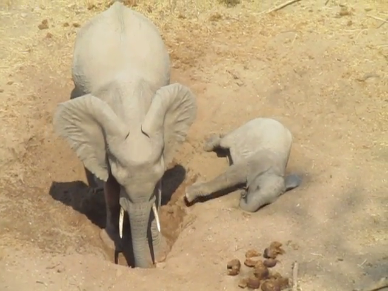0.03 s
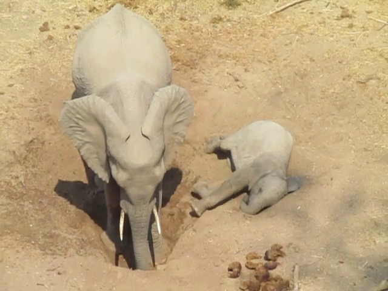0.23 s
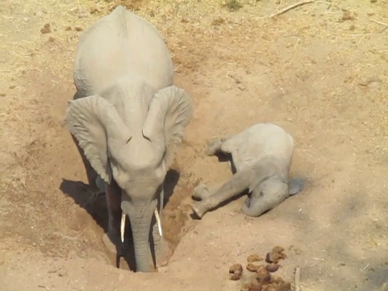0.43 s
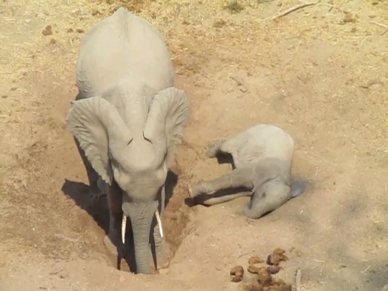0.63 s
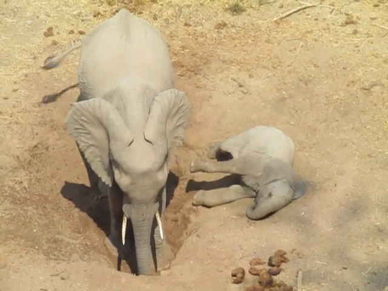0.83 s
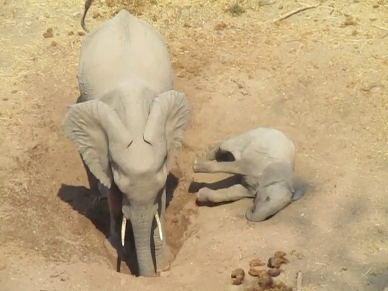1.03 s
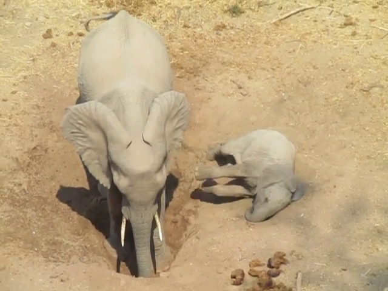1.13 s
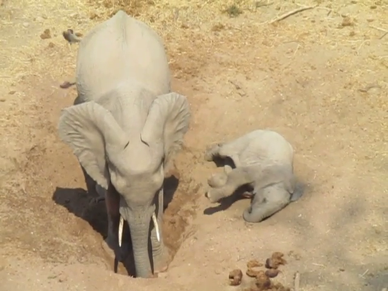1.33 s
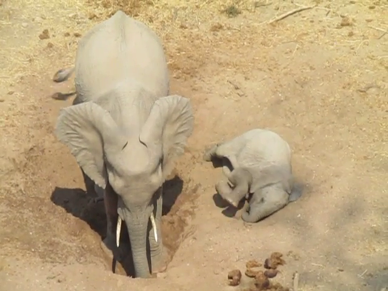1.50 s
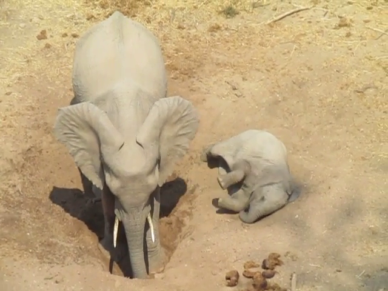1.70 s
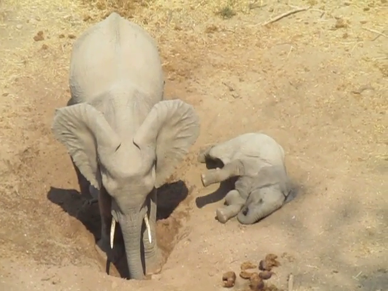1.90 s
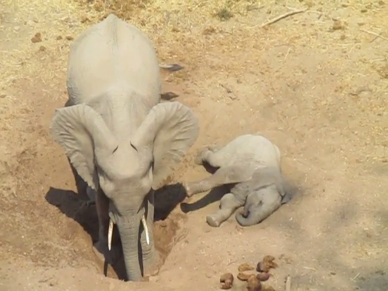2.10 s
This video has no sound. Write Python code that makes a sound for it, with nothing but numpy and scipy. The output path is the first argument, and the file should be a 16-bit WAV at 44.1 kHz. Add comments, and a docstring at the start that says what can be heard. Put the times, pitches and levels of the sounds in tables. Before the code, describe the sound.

Two raspy, high squeals from an elephant calf outdoors, over low buffeting wind.

```python
"""A young animal, such as an elephant calf, gives two shrill, hoarse squeals on open dry ground.
Each is a wavering high tone, split into sidebands and wrapped in rasp: the first by a slower flutter,
the second by a lower oscillator. Wind rumbles, buffets and pops on two microphone ports.
A far bird peeps once over faint hiss."""
import sys
import numpy as np
from scipy import signal
from scipy.fft import rfft, irfft, next_fast_len
from scipy.io import wavfile
from scipy.ndimage import uniform_filter1d, map_coordinates

SR = 44100
rng = np.random.default_rng(int(sys.argv[2]) if len(sys.argv) > 2 else 0)


def master_out(mix):
    """Clip the mix to full scale and print it as 16-bit PCM to the path in sys.argv[1]."""
    frames = np.transpose(np.atleast_2d(mix))
    ceiling = np.clip(frames, -1, 1)
    pcm = np.round(ceiling * 32767).astype(np.int16)
    wavfile.write(sys.argv[1], SR, pcm)


N = 94815

# Squeal pitch. Each row: time in seconds, pitch in Hz.
FIRST_PITCH = [(0, 1550), (.018, 1130), (.044, 1720), (.088, 1700), (.108, 1460), (.128, 1590),
               (.155, 1290), (.193, 1210), (.216, 1660), (.236, 1520), (.266, 1620), (.28, 1900),
               (.286, 2750), (.297, 1680), (.31, 1920), (.322, 1610), (.379, 1740), (.41, 1520)]
SECOND_PITCH = [(.99, 1480), (1.016, 1860), (1.038, 1680), (1.066, 2030), (1.086, 1880), (1.118, 2250),
                (1.148, 2010), (1.169, 2430), (1.191, 2120), (1.211, 2305), (1.236, 2280), (1.26, 2080)]
# Vocal effort. Each row: time in seconds, relative level in dB.
FIRST_EFFORT = [(0, -45), (.018, -57.5), (.047, -43.5), (.086, -43), (0.199, -48), (.296, -42.5),
                (.335, -43), (0.378, -37.5), (.418, -54)]
SECOND_EFFORT = [(.97, -56.5), (1.026, -43.5), (1.071, -39.5), (1.086, -42.5), (1.122, -37), (1.153, -40.5),
                 (1.167, -35.5), (1.239, -32), (1.267, -52)]
# Throat colour. Each row: frequency in Hz, relative gain in dB.
FIRST_THROAT = [(700, -23.5), (1450, 1.5), (3600, -0.5), (5200, -6.5), (6400, -1.5), (9000, -21),
                (15500, -20)]
BROKEN_THROAT = [(1700, -5), (3400, 2.5), (5000, -9.5), (6800, -8), (8400, -13), (10000, -32.5),
                 (11500, -14), (15500, -30)]
SECOND_THROAT = [(900, -26), (1400, -8), (2250, -2.5), (3000, -1.5), (3700, 0.5), (4900, 5), (5750, -20.5),
                 (6400, -5.5), (9900, -23), (11500, -17), (15500, -36.5)]
# Voice texture. Each row: time in seconds, rasp share of the power, sideband share of the rest.
VOICE_TEXTURE = [(.29, .25, 0.11), (.36, 0.02, 0.99), (.98, 0.38, 0.61), (1.07, 0.22, .22),
                 (1.22, 0.02, 0.63)]
# Wind rumble. Each row: time in seconds, relative level in dB.
RUMBLE_LEVEL = [(0, -29.5), (.13, -47), (.3, -29), (.56, -33), (1.15, -22.5), (2.15, -33.5)]
# Rumble colour. Each row: frequency in Hz, relative gain in dB.
RUMBLE_SPECTRUM = [(20, -17.5), (60, 2.5), (180, -2.5), (400, -15.5), (1000, -54.5)]
# Gusts. Each row: start and length in seconds, level and left-over-right in dB, brightness in Hz.
WIND_BUFFETS = [(0.298, 0.0314, -21.5, 13.5, 85.5), (0.369, 0.0579, -24, 7.5, 149.3),
                (0.473, 0.0449, -23.5, 0.5, 96.7), (.685, 0.0457, -13.5, -1.5, 170.3),
                (0.787, 0.06074, -21, -2, 217), (0.991, 0.1189, -18, 4, 245),
                (1.172, 0.0256, -16.5, 7.5, 67.3), (1.357, 0.0812, -22.5, -3, 223.3),
                (1.525, .09, -23, -4.5, 177.4), (2.043, 0.01153, -25, 4, 188.3)]
# Single eddies. Each row: time in seconds, level before filtering in dB, brightness in Hz, port.
EDDY_POPS = [(0.2122, 3, 169.9, "L"), (0.3744, -7, 264, "L"), (0.4825, -5.5, 137.3, "L"),
             (0.6836, 0.5, 161, "R"), (.6947, 3, 223, "R"), (0.7077, 1.5, 261, "R"),
             (0.7287, -0.5, 195, "L"), (0.7888, -2, 321, "R"), (0.9401, 1.5, 228, "R"), (1.0, -5, 310, "L"),
             (1.0544, 0, 202, "L"), (1.0842, -2, 248, "R"), (1.3695, -3, 220, "R"),
             (1.4017, -2.5, 332, "R"), (1.587, 4.5, 190.6, "L"), (1.7307, -2, 129.3, "L"),
             (1.8228, -1.5, 118.5, "L")]
# Ground and bush scatter. Each row: frequency in Hz, time to fall 60 dB in seconds.
SCATTER_DECAY = [(4000, 0.583), (12000, 0.384)]
# Hiss colour. Each row: frequency in Hz, relative gain in dB.
HISS_SPECTRUM = [(600, 8.5), (1500, -1.5), (5400, -5), (10000, -12)]
# Hiss strength. Each row: time in seconds, relative level in dB.
HISS_LEVEL = [(.7, -55), (.73, -58.5)]

BREAK_S, BREAK_FADE_S = 0.311, .027
LOWER_HZ, MAIN_REF_HZ = 1380, 2300  # lower oscillator's pitch at this main pitch
RUMBLE_PAN_DB, PORT_CUTOFF_HZ = 5.5, 983
WAKE_DB, WAKE_DECAY_S = -22, 0.01046
CRACK_S, CRACK_DB, CRACK_HZ = .7079, -13, 1117
BLEED_GAIN, BLEED_DELAY_S = 0.247, 0.00042
PEEP_S, PEEP_WIDTH_S, PEEP_HZ, PEEP_DB = 1.972, 0.01884, 2983, -58.5
BAND_LIMIT_HZ = 15800


def first_squeal():
    """Thin squeal that yelps upwards, then breaks: its period doubles."""
    pitch_hz = wavering_pitch(FIRST_PITCH, jitter=0.0416)
    tilted_throat = [(hz, db - 4 * np.log2(hz)) for hz, db in FIRST_THROAT]
    tone, sidebands = fluttered_tone(pitch_hz, tilted_throat, divisor=6, blur_rad=0.466)
    broken = sum(fluttered_tone(pitch_hz, BROKEN_THROAT, divisor=2, blur_rad=0.644))
    fade_rad = np.pi / 2 * np.clip((clock() - BREAK_S) / BREAK_FADE_S + .5, 0, 1)
    sidebands = np.cos(fade_rad) * levelled(sidebands) + np.sin(fade_rad) * levelled(broken)
    return voice(tone, sidebands, FIRST_EFFORT, FIRST_THROAT)


def second_squeal():
    """Louder squeal climbing in waves; a lower oscillator swings twice as far and adds sum tones."""
    pitch_hz = wavering_pitch(SECOND_PITCH, jitter=0.01825)
    lower_hz = LOWER_HZ * (pitch_hz / MAIN_REF_HZ) ** 2
    tone = sum(partial(k * pitch_hz, SECOND_THROAT, blur_rad=0.505) for k in range(1, 8))
    sidebands = sum(partial(k * pitch_hz + m * lower_hz, SECOND_THROAT, blur_rad=0.527)
                    for k in range(6) for m in range(1, 5))
    return voice(tone, sidebands, SECOND_EFFORT, SECOND_THROAT)


def wavering_pitch(rows, jitter):
    """Smooth glide in Hz; trembles more as the voice gets hoarser."""
    rasp_share = curves(VOICE_TEXTURE)[0]
    glide_hz = uniform_filter1d(curves(rows)[0], size=260)
    return glide_hz * (1 + jitter * np.sqrt(rasp_share) * wobble(450))


def fluttered_tone(pitch_hz, throat, divisor, blur_rad):
    """Harmonics, and the sidebands that a flutter at pitch / divisor puts between them."""
    lines = {k: partial(pitch_hz * k / divisor, throat, blur_rad) for k in range(divisor, 10 * divisor)}
    harmonics = sum(line for k, line in lines.items() if k % divisor == 0)
    sidebands = sum(line for k, line in lines.items() if k % divisor)
    return harmonics, sidebands


def partial(hz, throat, blur_rad):
    """Unsteady sine coloured by the throat; blur_rad is its phase wander at 2 kHz."""
    phase = 2 * np.pi * (np.cumsum(hz) / SR + rng.random())
    phase += blur_rad * np.sqrt(hz / 2000) * wobble(300)
    level_db = log_interp(throat, hz) + 3.03 * wobble(110)
    return amp(level_db) * (hz < BAND_LIMIT_HZ) * np.sin(phase)


def voice(tone, sidebands, effort, throat):
    """Tone, sidebands and throat-coloured rasp, mixed by power and scaled by effort."""
    t = clock()
    rasp_share, side_share = curves(VOICE_TEXTURE)
    pitched = np.sqrt(1 - side_share) * levelled(tone) + np.sqrt(side_share) * levelled(sidebands)
    breath = noise_pair(lambda f: amp(log_interp(throat, f)))[0]
    rasp = unit_rms(breath * amp(2.43 * wobble(600)))
    gate = (t >= effort[0][0]) & (t <= effort[-1][0])
    return gate * amp(curves(effort)[0]) * (np.sqrt(1 - rasp_share) * pitched + np.sqrt(rasp_share) * rasp)


def wind():
    """Rumble, buffets and pops on both ports, which smooth away the finer turbulence."""
    rumble = turbulence(lambda f: amp(log_interp(RUMBLE_SPECTRUM, f)))
    ports = amp(curves(RUMBLE_LEVEL)[0]) * pan_gains(RUMBLE_PAN_DB) * rumble
    for start_s, length_s, db, pan_db, hz in WIND_BUFFETS:
        ports += amp(db) * pan_gains(pan_db) * buffet(start_s, length_s, hz)
    for at_s, db, hz, port in EDDY_POPS:
        ports["LR".index(port)] += amp(db) * pop(at_s, hz)
    ports = filtered(ports, lambda f: 1 / np.hypot(1, (f / PORT_CUTOFF_HZ) ** 2))
    crack = filtered(eddy(CRACK_S, CRACK_HZ), lambda f: high_pass(f, CRACK_HZ))
    ports[1] += amp(CRACK_DB) * crack  # one right-port pop also cracks
    bleed = filtered(ports[::-1], lambda f: np.exp(-2j * np.pi * f * BLEED_DELAY_S))
    return ports - BLEED_GAIN * bleed  # each port enters the other channel late and inverted


def buffet(start_s, length_s, hz):
    """Gust: turbulence that rises fast, holds and dies away."""
    age_s = clock() - start_s
    attack = np.clip(age_s / 0.00488 + .5, 0, 1)
    release = np.exp(-np.maximum(age_s - length_s, 0) / 0.0041)
    return churn(attack * release, hz)


def pop(at_s, hz):
    """One eddy hitting a port, with a fluttering wake."""
    pulse = filtered(eddy(at_s, hz), lambda f: high_pass(f, hz=138))
    wake_swell = np.exp(-np.abs(clock() - at_s - WAKE_DECAY_S / 2) / WAKE_DECAY_S)
    return pulse + amp(WAKE_DB) * churn(wake_swell, hz)[0]


def eddy(at_s, hz):
    """Smooth pressure pulse passing a port; faster is brighter."""
    return 1 / (1 + (2 * np.pi * hz * (clock() - at_s)) ** 2)


def churn(swell, hz):
    """Burst of turbulence with the rms of its swell."""
    burst = swell * turbulence(lambda f: np.exp(-f / hz) * high_pass(f, .5 * hz))
    return unit_rms(burst) * np.sqrt(np.mean(swell ** 2))


def turbulence(response, lumps_db=4.5):
    """Lumpy noise of rms 1, different on each port."""
    return unit_rms(noise_pair(response) * amp(lumps_db * np.array([wobble(130), wobble(130)])))


def bird():
    """One far peep; pitch and level arch together."""
    arch = np.exp(-((clock() - PEEP_S) / PEEP_WIDTH_S) ** 2 / 2)
    pitch_hz = PEEP_HZ * (1 - .07 * (1 - arch))
    return amp(PEEP_DB) * arch * np.sin(2 * np.pi * np.cumsum(pitch_hz) / SR)


def ground_reflections(x, t60_s=0.0286):
    """Quick reflections off nearby earth, different at each microphone."""
    t = np.arange(SR // 50) / SR
    taps = rng.standard_normal((2, len(t))) * amp(-60 * t / t60_s)
    taps /= np.linalg.norm(taps, axis=1, keepdims=True)
    return signal.fftconvolve(x[None], taps, axes=1)[:, :N]


def bush_scatter(x):
    """Diffuse tail from ground and bush; treble dies first."""
    hz, t, spectra = signal.stft(rng.standard_normal((2, SR // 2)), SR, nperseg=256)
    decay = amp(-60 * t / log_interp(SCATTER_DECAY, hz)[:, None])
    tail = signal.istft(spectra * decay, SR, nperseg=256)[1]
    return signal.fftconvolve(x[None], tail / np.linalg.norm(tail[0]), axes=1)[:, :N]


def outdoor_hiss():
    """Faint, wide hiss."""
    mid, side = noise_pair(lambda f: amp(log_interp(HISS_SPECTRUM, f))) * [[1], [.8]]
    return amp(curves(HISS_LEVEL)[0]) * np.array([mid + side, mid - side])


def amp(db):
    return 10 ** (np.asarray(db) / 20)


def unit_rms(x):
    return x / np.sqrt(np.mean(x ** 2) + 1e-20)


def levelled(x):
    """Short-term rms held at 1."""
    return x / np.sqrt(np.abs(uniform_filter1d(x * x, size=500)) + 1e-9)


def log_interp(rows, hz):
    """Table value at hz, on a log frequency axis."""
    knots_hz, values = np.transpose(rows)
    return np.interp(np.log(hz + 1), np.log(knots_hz + 1), values)


def clock():
    """Sample times in seconds."""
    return np.arange(N) / SR


def curves(rows):
    """Per-sample curve for each column after the time."""
    times_s, *columns = np.transpose(rows)
    return [np.interp(clock(), times_s, column) for column in columns]


def wobble(knots_per_s):
    """Smooth random curve."""
    knots = rng.standard_normal(int(N * knots_per_s / SR) + 4)
    return map_coordinates(knots, [clock() * knots_per_s])


def filtered(x, response):
    """Apply a frequency response by FFT."""
    size = next_fast_len(N + SR // 4)
    return irfft(rfft(x, size) * response(np.fft.rfftfreq(size, 1 / SR)), size)[..., :N]


def noise_pair(response):
    """Two independent coloured noises of rms 1."""
    return unit_rms(filtered(rng.standard_normal((2, N)), response))


def high_pass(f, hz):
    """Causal second-order response."""
    s = 1j * f / hz
    return s * s / (s * s + np.sqrt(2) * s + 1)


def pan_gains(left_over_right_db):
    """Left and right gains of mean power 1."""
    gains = amp(np.array([[left_over_right_db], [-left_over_right_db]]) / 2)
    return gains / np.sqrt(np.mean(gains ** 2))


def placed(x, pan_db, lag_s=.00002):
    """Panned source; reaches the right microphone first."""
    delays_s = np.array([[.5], [-.5]]) * lag_s
    return pan_gains(pan_db) * filtered(x, lambda f: np.exp(-2j * np.pi * f * delays_s))


def scene():
    """Squeals and bird in the open, under the wind."""
    calls = placed(first_squeal(), pan_db=3) + placed(second_squeal(), pan_db=-4.5) + bird()
    mono = calls.mean(axis=0)
    echoes = amp(-7.5) * ground_reflections(mono) + amp(-14.5) * bush_scatter(mono)
    return amp(-.5) * calls + echoes + wind() + outdoor_hiss()


def record(dry):
    """Soft clip at full scale, then band limit."""
    rounded = dry / (1 + dry ** 8) ** (1 / 8)
    return filtered(rounded, lambda f: f < BAND_LIMIT_HZ)


dry = scene()
out = record(dry)
master_out(out)
```